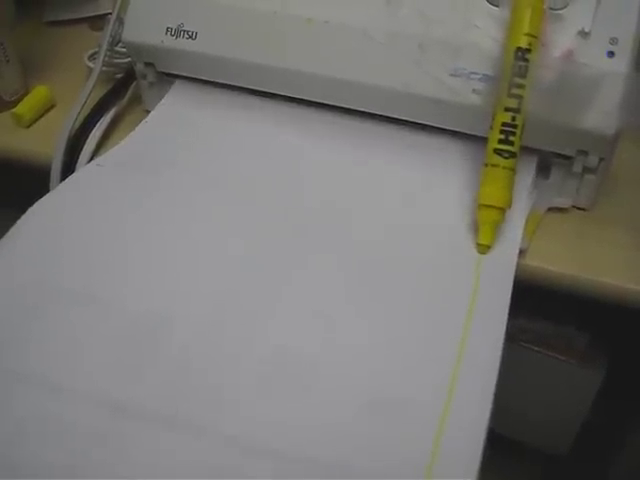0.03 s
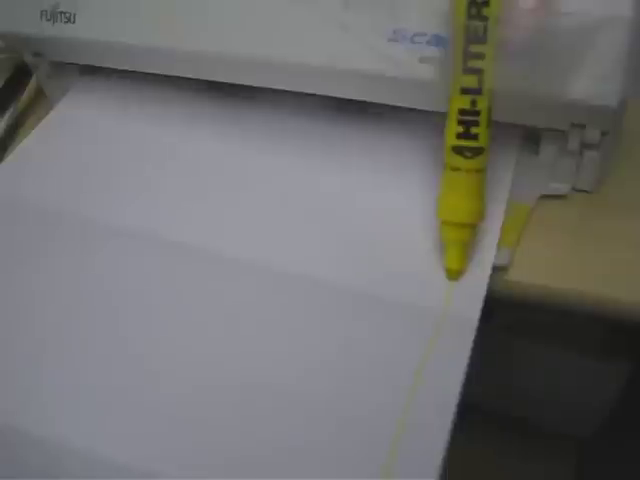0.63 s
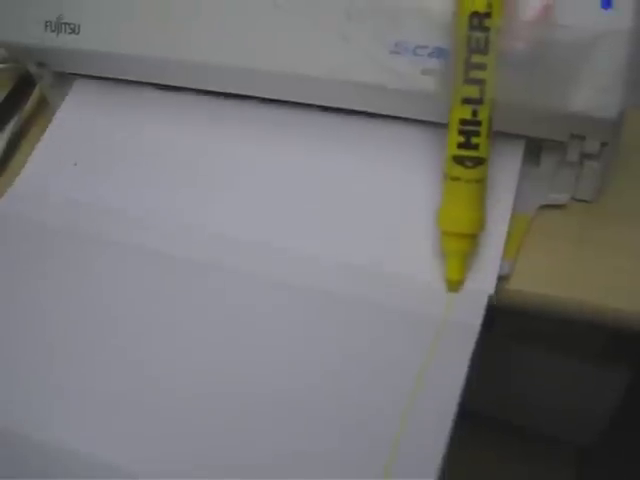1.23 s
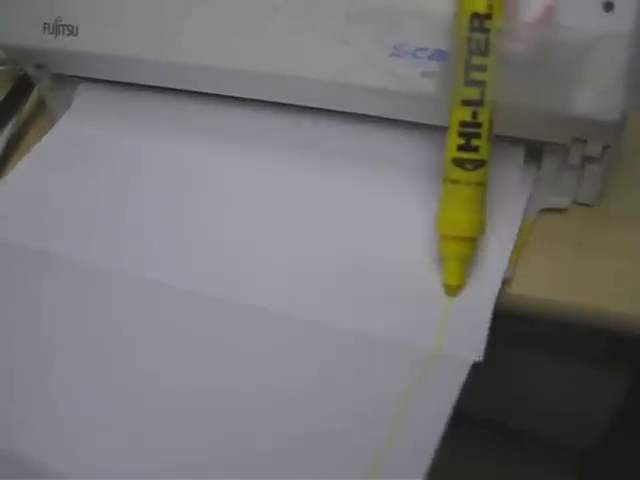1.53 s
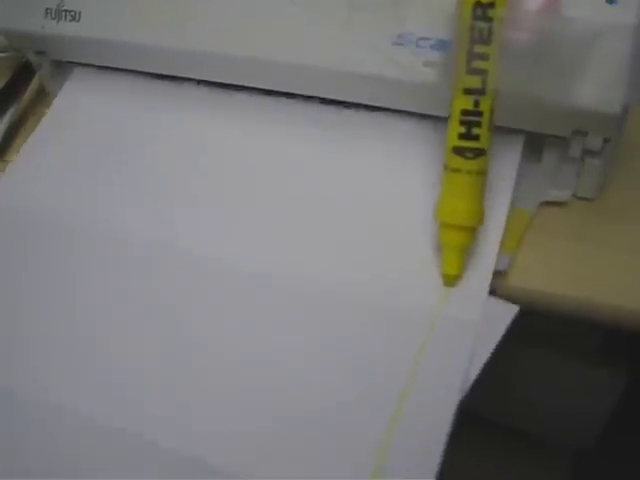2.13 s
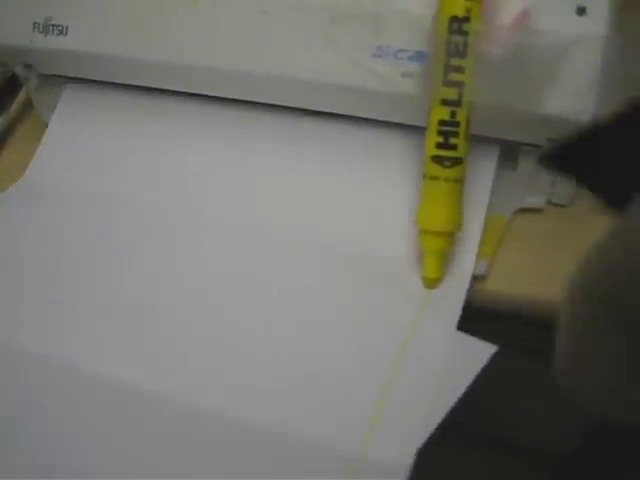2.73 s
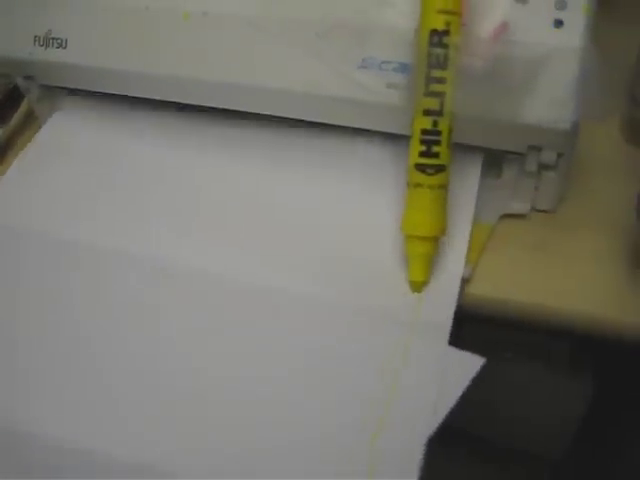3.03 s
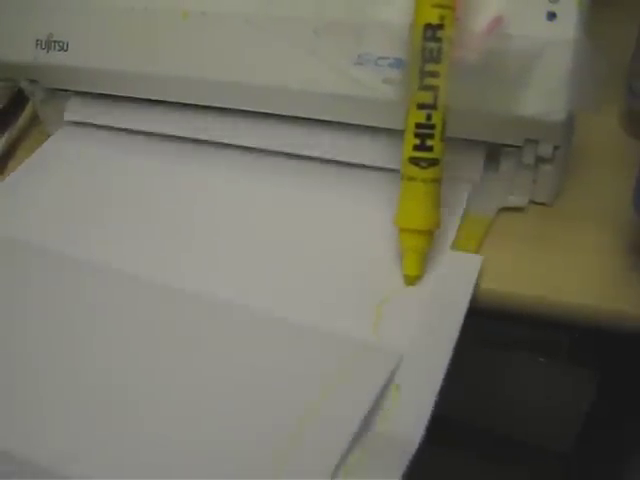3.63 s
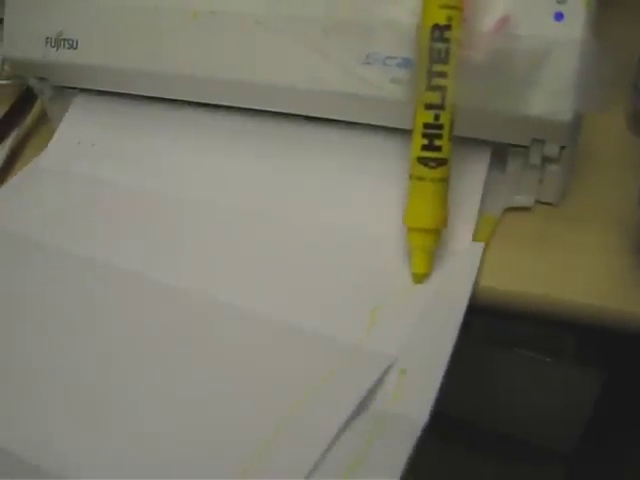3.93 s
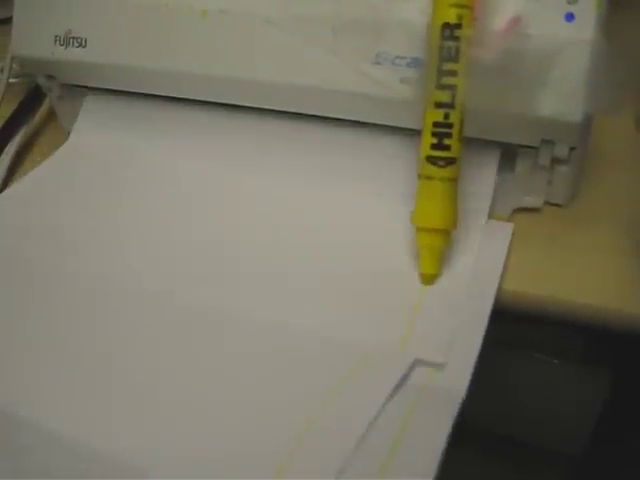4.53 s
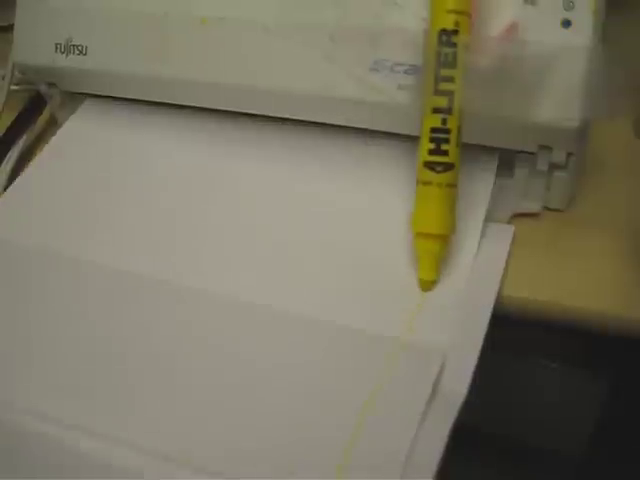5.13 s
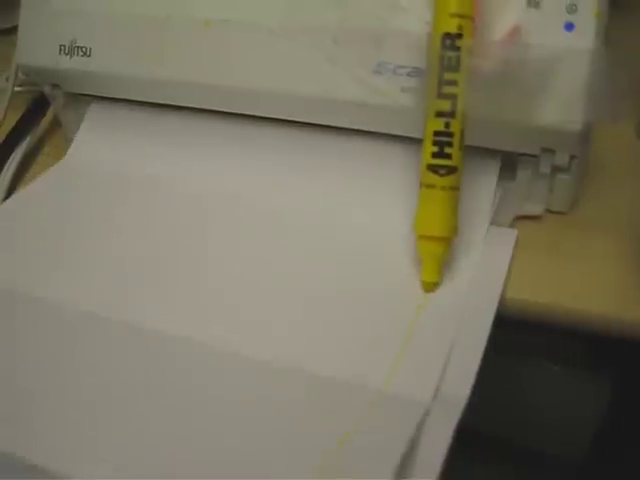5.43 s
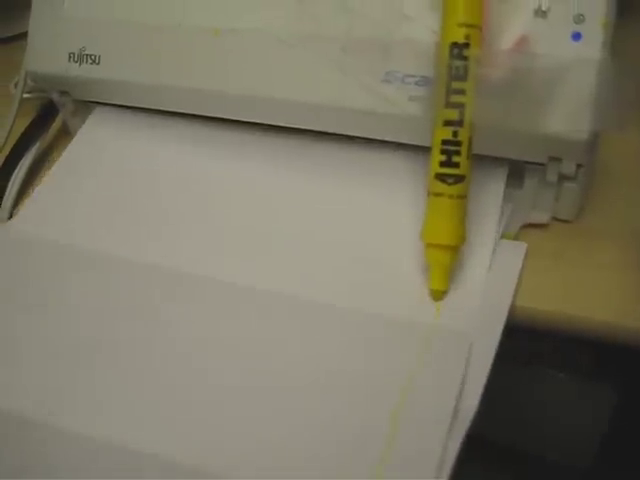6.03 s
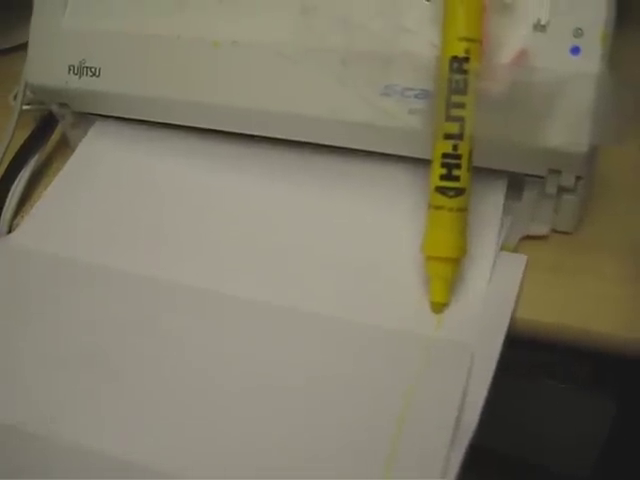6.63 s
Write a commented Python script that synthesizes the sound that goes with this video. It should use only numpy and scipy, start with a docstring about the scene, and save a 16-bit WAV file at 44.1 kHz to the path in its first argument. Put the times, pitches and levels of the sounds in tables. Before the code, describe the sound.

A desktop scanner is already feeding paper, close to the microphone in an office. Its motor holds a steady whine over rumbling rollers and the uneven hiss of sliding sheets. The sound cuts out briefly at about 0.5 seconds and returns a little louder. The paper snaps and crinkles irregularly as it buckles, with sharper cracks around 0.8, 1.7, 2.1, 2.9 and 3.7 seconds, and short rasps in between. The loudest snap comes just after 5 seconds, as a sheet's edge flicks free and lightly slaps the tray. At about 6 seconds the motor, rollers and paper rush stop. The paper settles with a few soft scrapes, and the plastic feed mechanism gives a light click at 6.3 seconds, followed at once by a loud, sharp one. Faint ventilation and electrical hum remain until the end, just before 7 seconds.

```python
"""A desktop scanner feeding paper

A scanner pulls sheets through, close to a mono microphone in an office. Its stepper motor sings over
rumbling rollers and the rush of sliding paper, which snaps as it buckles; a trailing edge flicks free.
The sound cuts out briefly near the start. At the end the motor stops, the paper settles and the feed
mechanism clicks. Ventilation and electrical hum lie underneath."""
import sys
import numpy as np
from scipy import signal
from scipy.fft import rfft, irfft
from scipy.io import wavfile
from scipy.ndimage import uniform_filter1d

SR = 44100
rng = np.random.default_rng(int(sys.argv[2]) if len(sys.argv) > 2 else 0)


def waveform_to_disk(signal):
    """Save audio, clipped to [-1, 1], as 16-bit WAV at the path in sys.argv[1]."""
    frames = np.transpose(np.atleast_2d(signal))
    scaled = np.clip(frames, -1, 1) * 32767
    samples = np.round(scaled).astype(np.int16)
    wavfile.write(sys.argv[1], SR, samples)


N = 298998
T = np.arange(N) / SR

# The paper's steady slide: (time [s], rubbing level [dB], extra flexing [dB], extra top treble [dB])
PAPER_SLIDE = [(0, -37.5, 1.5, -1), (.2, -37.5, 4.5, -6), (.44, -37, 3, -4), (.6, -33.5, -0.5, -10),
               (1.0, -32, 1.5, -5.5), (1.4, -30, -0.5, -1.5), (1.7, -33.5, 2, -5), (2.26, -33.5, 3.5, -1),
               (2.42, -33.5, -2.5, -6), (2.75, -34.5, -2, 0), (3.0, -34, 2, -5), (3.7, -33, 0.5, 1.5),
               (4.35, -35.5, -0.5, 3.5), (5.05, -34.5, 1.5, 2), (5.33, -36.5, -3.5, -0.5),
               (5.7, -33, -5.5, 0), (5.88, -36.5, 6, 3), (5.98, -42, -1, 2), (6.05, -40, -5, 2)]
# Tone colour of sliding paper: (frequency [Hz], level [dB])
PAPER_SPECTRUM = [(600, -37.5), (1100, -15.5), (1500, -9), (1750, -12), (2100, -7), (3000, -6.5),
                  (4000, -5.5), (5300, -6.5), (6300, -12.5), (7600, -13.5), (9300, -13), (11200, -15.5),
                  (14500, -22), (15800, -30)]
# The sheet drags on the guides or, if negative, goes slack:
# (start [s], length [s], extra rubbing [dB], extra edge hiss [dB])
DRAGS = [(1.004, 0.25, 3.5, 1.5), (1.206, 0.19, 4.5, 1), (1.392, 0.14, 1.5, 3), (1.81, 0.11, 1, 0),
         (2.06, 0.13, 2, -0.5), (2.21, .11, 3, 0), (2.404, 0.35, 1.5, 1.5), (2.633, 0.14, 5, -0.5),
         (3.384, 0.12, 2.5, -1), (3.464, 0.1, 2, 5.5), (3.54, 0.078, 2, 6.5), (3.683, .07, 2, 1.5),
         (3.748, 0.16, -2.5, -7), (3.892, 0.16, 5, -5), (4.07, 0.23, 8, .5), (4.34, 0.45, 3, 3.5),
         (4.904, 0.18, 5, 1), (5.104, 0.18, 3.5, 4), (5.29, 0.2, -1.5, 11), (5.406, .23, 4.5, 3),
         (5.736, 0.16, 4.5, -0.5), (5.91, .085, 2.5, 7)]
# The sheet catches and rasps at one resonance: (time [s], half length [s], frequency [Hz], boost [dB])
RASPS = [(.25, 0.33, 6070, 5), (0.219, .3, 9600, 4), (0.97, 0.1, 3800, 7.5), (1.343, 0.018, 4300, 9),
         (2.6, 0.15, 6300, 5), (3.825, .04, 4000, 10), (4.22, 0.042, 6300, 6), (4.39, 0.054, 5400, 2.5),
         (4.816, .09, 3280, 5.5), (5.735, 0.046, 5180, 7.5)]
# The paper buckles and snaps: (time [s], crack peak [dB], centre frequency [Hz], spread [octaves])
SNAPS = [(0.179, -22, 2500, 0.57), (.591, -14.5, 2500, 0.8), (0.8002, -10.5, 1650, .9),
         (0.825, -15.5, 1210, 1.5), (0.888, -19.5, 900, 1.2), (1.029, -17, 3200, .9),
         (1.095, -22.5, 1100, 0.69), (1.237, -22, 900, 1.6), (1.654, -4.5, 2240, 0.81),
         (1.714, -16, 1900, 0.5), (1.873, -19, 2380, 1), (2.138, -10, 1750, 0.77), (2.168, -17.5, 1700, 2),
         (2.912, -10, 3200, 1.05), (2.977, -21.5, 900, 2.3), (3.363, -19.5, 1320, 0.8),
         (3.448, -11, 3350, 0.91), (3.6593, -6, 2750, 0.77), (3.74, -10, 3300, 1.2),
         (3.841, -13.5, 3700, .5), (4.135, -18.5, 1000, 0.59), (4.268, -20, 1300, 1.2),
         (4.3, -25.5, 745, 0.28), (4.495, -15.5, 1870, 0.71), (5.063, -1.5, 3480, 0.47),
         (5.0632, -10, 7300, 0.62), (5.128, -9.5, 4940, .22), (5.172, -16.5, 2900, .28),
         (5.773, -15, 4400, 0.77), (5.872, -17.5, 2390, 0.31)]
# Motor speed: (time [s], step rate [Hz])
STEP_RATE = [(0, 168.8), (.6, 168.92), (4, 168.91), (5.97, 168.86), (6.04, 165)]
# Load on the motor sets its two main harmonics, tones at whole multiples of the step rate:
# (time [s], level of harmonic 4 [dB], level of harmonic 8 [dB])
MOTOR_LOAD = [(0, -53, -51), (.12, -44, -54), (.28, -43.5, -52), (.4, -45, -46.5), (.65, -39, -38.5),
              (2.0, -37.5, -36.5), (2.85, -43, -40.5), (3.15, -37, -36.5), (3.8, -38, -35.3),
              (4.85, -36, -34.5), (5.2, -42, -37), (5.52, -41.5, -37.5), (5.94, -42, -39.5),
              (5.99, -44, -54)]
# Weaker motor tones: (harmonic [number], level relative to harmonic 8 [dB])
MOTOR_WHINE = [(9, -17.5), (12, -12.5), (16, -15), (20, -12.5), (24, -7.5), (36, -24.5)]
# The motor's tone shifts: (time [s], half length [s], drop of harmonic 4 [dB], rise of harmonic 6 [dB])
TONE_SHIFTS = [(0.362, 0.12, 10, 9.5), (2.397, .08, 8, 3), (2.93, 0.13, -1.5, 11), (3.467, 0.055, 4.5, -7),
               (5.36, .075, 9, 7), (5.735, 0.31, 1, 14)]
# Loudness of the rollers: (time [s], level [dB])
ROLLER_LEVEL = [(0, -45), (.6, -44), (.8, -41), (2.2, -39.5), (2.8, -40.5), (3.8, -42.5), (4.5, -41),
                (5.6, -42.5)]
# Tone colour of the rollers: (frequency [Hz], level [dB])
ROLLER_SPECTRUM = [(40, -24.5), (130, -14.5), (300, -10), (420, -5), (480, -3.5), (620, 0.5), (800, -5),
                   (1100, 0.5), (1300, -6.5), (1500, -6.5), (1750, -5), (2400, -14), (5000, -43)]
# The rollers grind louder for a moment: (time [s], half length [s], boost [dB])
GRINDS = [(1.42, 0.048, 5.5), (2.972, .08, 5.5), (3.42, 0.11, 4.5), (4.137, 0.056, 4), (5.878, 0.18, 4)]
# The sheet flaps against the tray: (time [s], peak [dB])
FLAPS = [(5.068, -26), (5.0742, -23.5), (5.0935, -28), (5.102, -29)]
# How the tray rings: (frequency [Hz], level [dB], time to fade by 60 dB [s])
TRAY_MODES = [(470, -8, 0.082), (577, -6.5, 0.041), (860, -11, .02)]
# The paper shifts after the stop: (time [s], level [dB], length [s])
PAPER_SHIFTS = [(6.075, -56, 0.011), (6.142, -59, 0.013), (6.249, -45.5, 0.039), (6.285, -40, 0.025),
                (6.338, -54, 0.013), (6.382, -55, 0.0073)]
# Tone colour of those shifts: (frequency [Hz], level [dB])
SHIFT_SPECTRUM = [(1000, -4), (3000, -5), (4500, 2), (7000, -3), (10000, -8), (15000, -17)]
# Tone colour of a knock on the housing: (frequency [Hz], level [dB])
HOUSING_SPECTRUM = [(100, -34), (350, 3), (520, 12.0), (1200, 3.5), (2500, -6.5), (9000, -50)]
# The feed mechanism clicks: (time [s], peak [dB], treble cutoff [Hz])
CLICKS = [(6.2995, -19.5, 2540), (6.367, -4, 12000)]
# How the plastic latch rings: (frequency [Hz], level [dB], time to fade by 60 dB [s])
LATCH_MODES = [(253, -25.5, 0.028), (780, -21, 0.014), (1360, -20, 0.0073), (1790, -17.5, 0.014),
               (2570, -16, 0.021), (3180, -11, 0.013), (4030, -3.5, 0.0091), (4600, -7, 0.012),
               (5870, -4, 0.008), (7350, 4, 0.0042), (7980, 7, 0.003), (8860, -5.5, .006),
               (9800, -5.5, 0.0062), (12700, -26, .004)]
# Tone colour of the ventilation: (frequency [Hz], level [dB])
VENT_SPECTRUM = [(20, -5.5), (35, -6.5), (65, -11.5), (90, -9.5), (125, -5.5), (400, -3.5), (480, -7.5),
                 (900, -7), (1500, -13), (3700, -19), (4300, -22.5), (9000, -32), (10500, -32.5),
                 (15800, -43.5)]
# Steady electrical tones: (frequency [Hz], level [dB])
HUM_TONES = [(60, -65), (119, -61), (883, -63.5), (7860, -77), (7885, -77)]
# A faint low drone that slowly rises: (time [s], pitch [Hz], level [dB])
DRONE = [(4.3, 43, -85), (4.55, 45, -55), (4.7, 46.6, -54), (5.03, 49.56, -51), (5.1, 50.2, -60),
         (5.6, 53.3, -55), (5.8, 53, -58), (6, 53, -85)]
# The drone's tones: (harmonic [number], relative level [dB])
DRONE_HARMONICS = [(1, -5.5), (2, -8), (3, -0.5), (4, -4)]


def sliding_paper(hiss_db=-1.0, flex_per_drag=-0.28, patch_db=1.53, flutter_db=0.94):
    """Friction shakes the sheet, whose broad resonances drift as it bends and moves on."""
    slips = friction(slips_per_s=900, spread_db=2.0, grain_db=-8.5)
    hz, t, grid = signal.stft(slips, SR, nperseg=512, noverlap=384)  # frequency by time
    rub_db, flex_db, treble_db = curves_at(PAPER_SLIDE, t)
    drag_db, scrape_db = guide_drag(t)
    flex_band = spectrum_at([(2900, 0.99), (3900, 0.011)], hz)[:, None]
    hiss_band = spectrum_at([(5200, 0.14), (6600, 0.72)], hz)[:, None]
    top_band = spectrum_at([(9500, 0.021), (14000, 0.82)], hz)[:, None]
    patches = uniform_filter1d(rng.standard_normal(grid.shape), size=7, axis=0)
    patches = unit(uniform_filter1d(patches, size=36, axis=1))
    gain_db = rub_db + drag_db + top_band * treble_db + patch_db * patches
    gain_db += flex_band * (flex_db + flex_per_drag * drag_db)  # a taut sheet flexes less
    gain_db += hiss_band * (hiss_db + scrape_db)  # edges scraping on the guides add treble
    for s, half_length, rasp_hz, db in RASPS:
        away = (np.log2(hz / rasp_hz)[:, None] / 0.2) ** 2
        peak = np.exp(-away) - 0.1 * np.exp(-away / 8)  # with a shallow dip on each side
        gain_db += db * peak * swell(t, s, half_length)
    shape = amp(spectrum_at(PAPER_SPECTRUM, hz))
    shape /= np.sqrt(np.mean(shape ** 2 * ((hz > 3400) & (hz < 6000))))  # this band sets the level
    rush = signal.istft(grid * shape[:, None] * amp(gain_db), SR, nperseg=512, noverlap=384)[1][:N]
    return rush * amp(flutter_db * wander(49)) * running(T)


def guide_drag(t, attack_s=0.03, hold_share=0.05):
    """Extra rubbing and edge hiss in dB: each drag builds quickly, holds briefly, then eases off."""
    total = np.zeros((2, len(t)))
    for s, length, rub_db, hiss_db in DRAGS:
        release_s = max(length - attack_s, .01) * (1 - hold_share)
        rise, fall = (t - s) / attack_s, (s + length - t) / release_s
        total += np.outer([rub_db, hiss_db], np.clip(np.minimum(rise, fall), 0, 1))
    return total


def paper_snaps(travel_s=0.002159, crinkle_t60=0.036, housing_db=-13, crinkle_db=-1.5):
    """A buckle lets go: bending waves reach the edge treble first, then the sheet crinkles on."""
    out, t, hz = np.zeros(N), np.arange(4096) / SR, np.fft.rfftfreq(4096, 1 / SR) + 1
    wave_delay = np.exp(-4j * np.pi * travel_s * np.sqrt(hz * 1000))  # 1000 Hz arrives after travel_s
    housing = amp(housing_db + spectrum_at(HOUSING_SPECTRUM, hz))
    envelope = amp(-60 * t / crinkle_t60) * (1 - np.exp(-t / 0.00084))
    for s, db, centre_hz, octaves in SNAPS:
        band = 1 / (1 + (np.log2(hz / centre_hz) / octaves) ** 2) ** 1.45
        band += housing * min(octaves, 1) ** 2  # broad snaps knock the housing too
        crack = unit(irfft(band * wave_delay))
        crinkle = unit(irfft(band * rfft(rng.standard_normal(len(t)))) * envelope)
        add(out, s, amp(db) * (crack + amp(crinkle_db) * crinkle) / abs(crack).max())
    return out


def stepper_motor(third_max_db=-49.5, sixth_rest_db=-53):
    """The motor sings at multiples of its step rate; load sets their strength, loose gears a waver."""
    steps = np.cumsum(curves_at(STEP_RATE, T)[0]) / SR + .0015 * wander(12)
    fourth_db, eighth_db = curves_at(MOTOR_LOAD, T)
    sixth_db = sixth_rest_db
    for s, half_length, drop_db, rise_db in TONE_SHIFTS:
        shift = swell(T, s, half_length)
        fourth_db -= drop_db * shift
        sixth_db += rise_db * shift
    harmonics = [(4, fourth_db), (8, eighth_db), (6, sixth_db)]
    harmonics += [(k, eighth_db + db) for k, db in MOTOR_WHINE]
    harmonics += [(3, np.minimum(third_max_db, eighth_db - 5))]  # stays level once the drive is loaded
    tone = sum(amp(db + .6 * wander(12)) * np.sin(2 * np.pi * (k * steps + rng.random()))
               for k, db in harmonics)
    return np.sqrt(2) * tone * running(T)


def rollers():
    """Rubber rollers and gears rumble in the plastic housing."""
    grind_db = sum(db * swell(T, s, half_length) for s, half_length, db in GRINDS)
    rumble = colour(friction(slips_per_s=250, spread_db=0.5, grain_db=-8.5), ROLLER_SPECTRUM)
    return amp(curves_at(ROLLER_LEVEL, T)[0] + grind_db) * rumble * running(T) ** 2


def edge_flaps():
    """The sheet's trailing edge slaps the tray and makes it ring."""
    out = np.zeros(N)
    for s, db in FLAPS:
        add(out, s, amp(db) * ring(TRAY_MODES, cutoff_hz=1500))
    return out


def latch_clicks():
    """The feed mechanism's plastic latch is struck and rings briefly."""
    out = np.zeros(N)
    for s, db, cutoff_hz in CLICKS:
        add(out, s, amp(db) * ring(LATCH_MODES, cutoff_hz))
    return out


def settling_paper():
    """After the motor stops, the paper shifts with a few soft scrapes."""
    out = np.zeros(N)
    for s, db, length in PAPER_SHIFTS:
        scrape = colour(rng.standard_normal(N), SHIFT_SPECTRUM)[:round(length * SR)]
        add(out, s - length / 2, amp(db) * scrape * np.sqrt(2 * np.hanning(len(scrape))))
    return out


def room(x, echo_db, t60):
    """Desk and walls add a weak echo that fades by 60 dB in t60 seconds."""
    t = np.arange(SR // 3) / SR
    tail = rng.standard_normal(len(t)) * amp(-60 * t / t60) * (t > .004)
    return x + amp(echo_db) * signal.oaconvolve(x, tail / np.linalg.norm(tail))[:N]


def office(vent_db=-48.4):
    """Ventilation, electrical hum and a passing low drone."""
    air = amp(vent_db) * colour(rng.standard_normal(N), VENT_SPECTRUM)
    hum = sum(amp(db) * np.sin(2 * np.pi * hz * T + 1.1 * wander(5)) for hz, db in HUM_TONES)
    pitch_hz, level_db = curves_at(DRONE, T)
    cycles = np.cumsum(pitch_hz) / SR
    drone = sum(amp(level_db + db + 1.3 * wander(8)) * np.sin(2 * np.pi * k * cycles)
                for k, db in DRONE_HARMONICS)
    return air + np.sqrt(2) * (hum + drone)


def friction(slips_per_s, spread_db, grain_db):
    """A hiss of countless tiny slips, plus scattered larger ones where fibres catch."""
    sizes = amp(spread_db * np.minimum(rng.exponential(1, N), 4)) * rng.choice([-1, 1], N)
    hiss = rng.standard_normal(N)
    slips = unit(sizes * (rng.random(N) < slips_per_s / SR))
    return unit(hiss + amp(grain_db) * slips)


def ring(modes, cutoff_hz):
    """The fading tones of a struck part, at peak 1; a soft contact weakens the high ones."""
    t = np.arange(SR // 8) / SR
    x = np.zeros(len(t))
    for k, (hz, db, t60) in enumerate(modes):
        strength = (-1) ** k / (1 + (hz / cutoff_hz) ** 2)
        x += strength * amp(db - 60 * t / t60) * np.sin(2 * np.pi * hz * t)
    return x / abs(x).max()


def running(t):
    """1 while the drive turns, 0 once it has stopped."""
    return np.interp(t, [5.98, 6.045], [1, 0])


def swell(t, s, half_length):
    """A smooth bump of height 1 around time s."""
    return np.exp(-((t - s) / half_length) ** 2)


def wander(rate_hz):
    """A random drift of typical size 1, mostly slower than rate_hz."""
    hz = np.fft.rfftfreq(N, 1 / SR)
    return unit(irfft(rfft(rng.standard_normal(N)) / (1 + (hz / rate_hz) ** 2), N))


def colour(x, spectrum):
    """Gives x a tone colour, at average strength 1."""
    hz = np.fft.rfftfreq(len(x), 1 / SR)
    return unit(irfft(rfft(x) * amp(spectrum_at(spectrum, hz)), len(x)))


def curves_at(rows, t):
    """The values of a time table's columns at times t."""
    s, *columns = np.transpose(rows)
    return [np.interp(t, s, c) for c in columns]


def spectrum_at(points, hz):
    """The values of a frequency table at hz, joined on a log-frequency axis."""
    f, values = np.transpose(points)
    return np.interp(np.log(hz + 1), np.log(f + 1), values)


def amp(db):
    """Turns decibels into a gain."""
    return 10 ** (np.asarray(db) / 20)


def unit(x):
    """Scales x to an average strength (rms) of 1."""
    return x / np.sqrt(np.mean(x ** 2) + 1e-20)


def add(mix, s, sound):
    """Mixes a sound in at time s."""
    part = mix[round(s * SR):][:len(sound)]
    part += sound[:len(part)]


def scene():
    """The scanner close by, in a quiet office; both channels alike."""
    scanner = stepper_motor() + rollers() + sliding_paper() + paper_snaps()
    scanner += edge_flaps() + settling_paper() + latch_clicks()
    mono = room(scanner, echo_db=-31, t60=.12) + office()
    return np.array([mono, mono])


def record(dry):
    """The sharpest peaks are rounded off, the sound cuts out briefly and the highest treble is removed."""
    rounded = dry / (1 + (dry / .72) ** 4) ** .25
    dropout = np.where((T > .4545) & (T < .587), amp(-72), 1)
    lowpass = signal.firwin(511, cutoff=15900, window=("kaiser", 9), fs=SR)
    return signal.oaconvolve(rounded * dropout, lowpass[None], "same")


dry = scene()
out = record(dry)
waveform_to_disk(out)
```